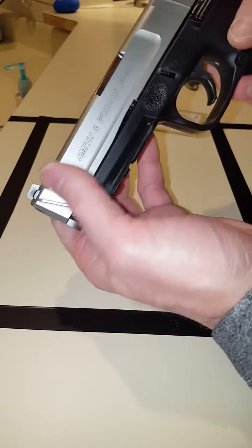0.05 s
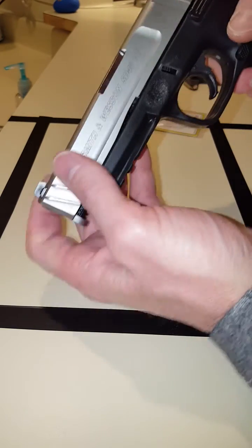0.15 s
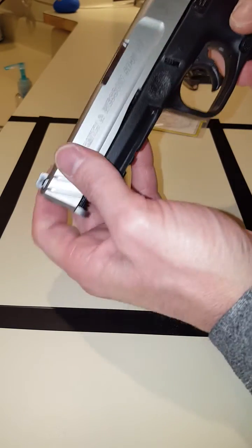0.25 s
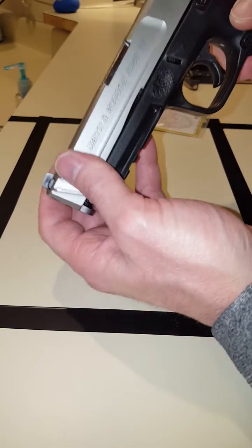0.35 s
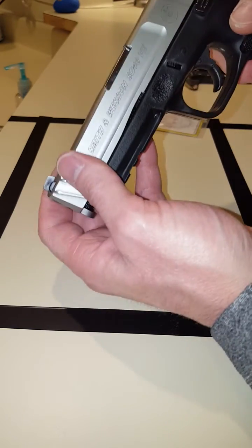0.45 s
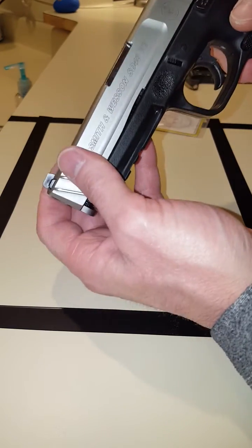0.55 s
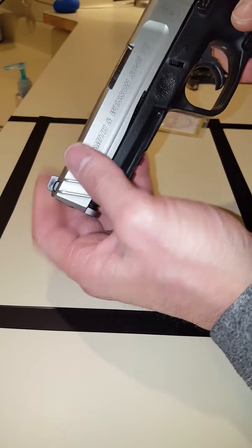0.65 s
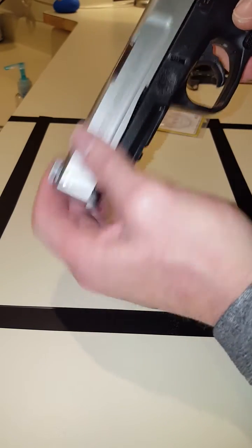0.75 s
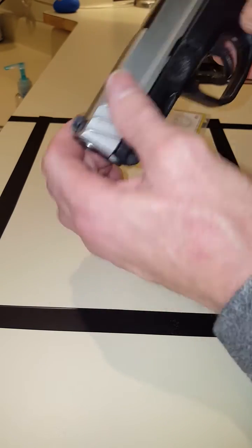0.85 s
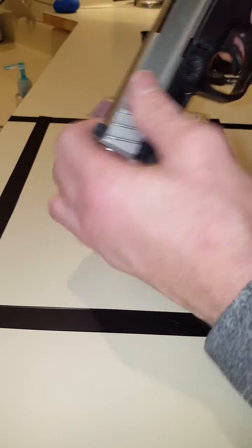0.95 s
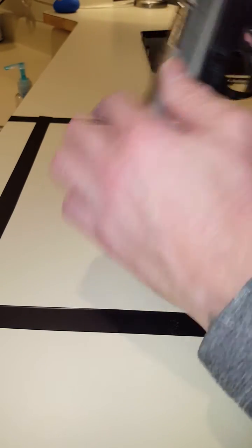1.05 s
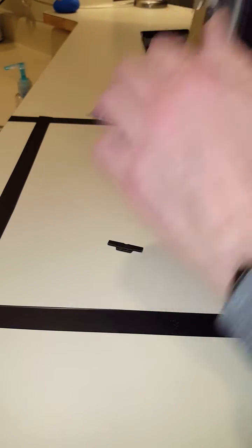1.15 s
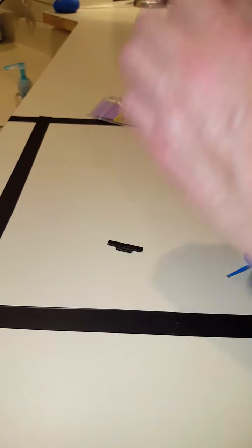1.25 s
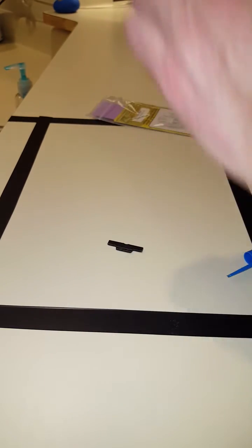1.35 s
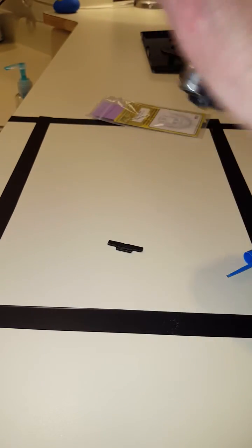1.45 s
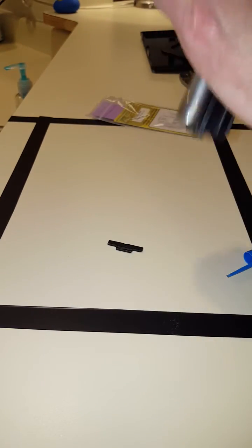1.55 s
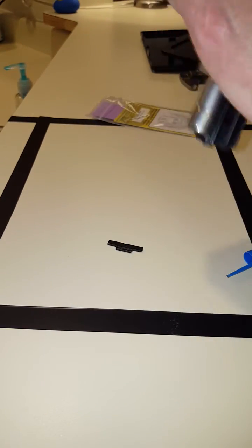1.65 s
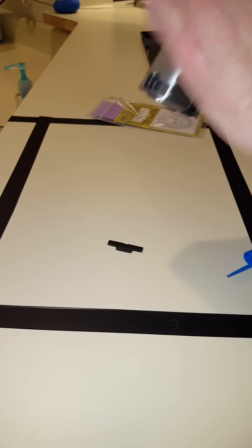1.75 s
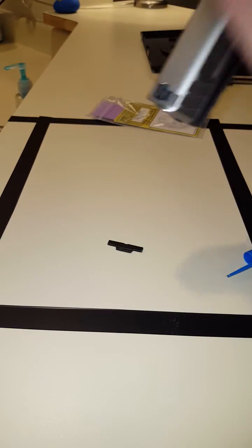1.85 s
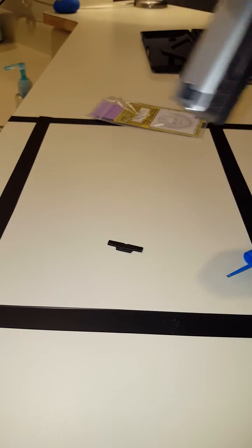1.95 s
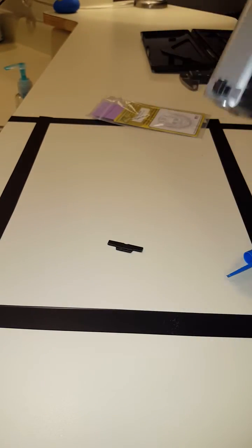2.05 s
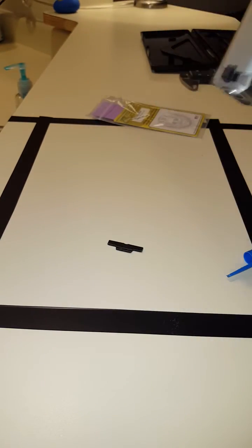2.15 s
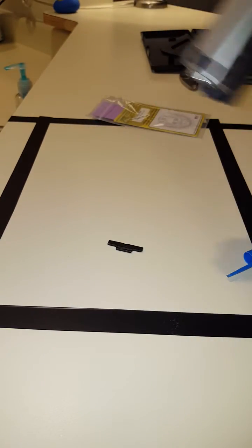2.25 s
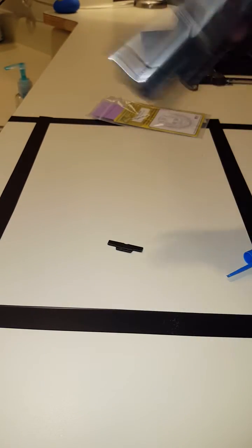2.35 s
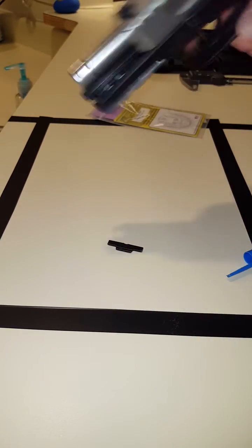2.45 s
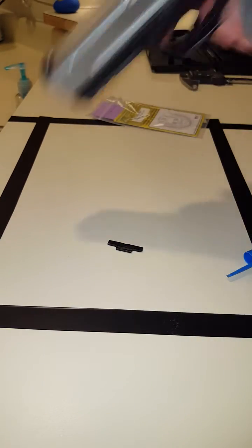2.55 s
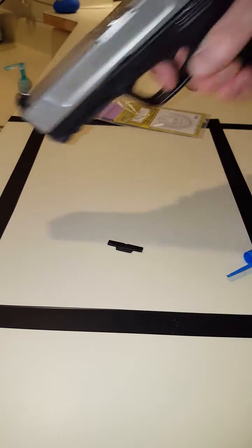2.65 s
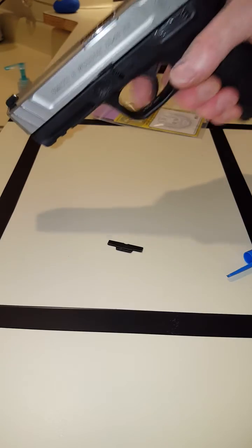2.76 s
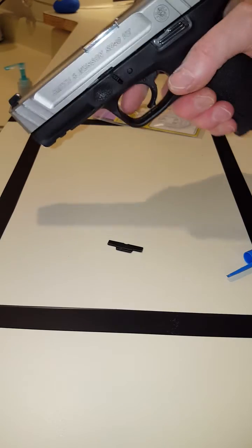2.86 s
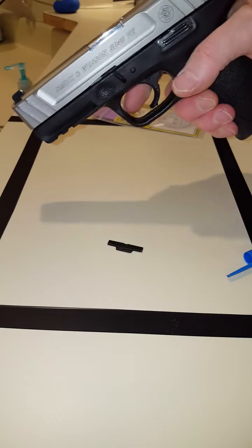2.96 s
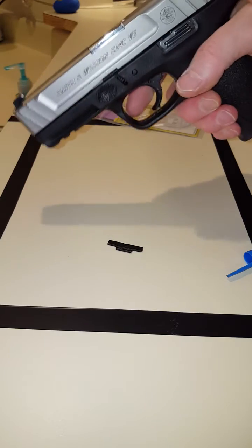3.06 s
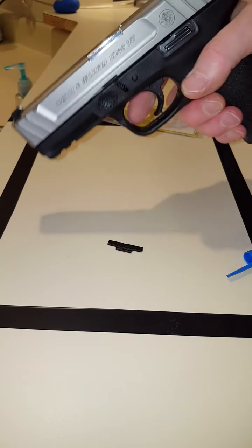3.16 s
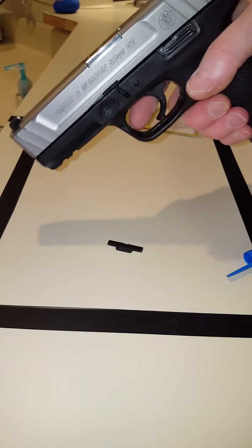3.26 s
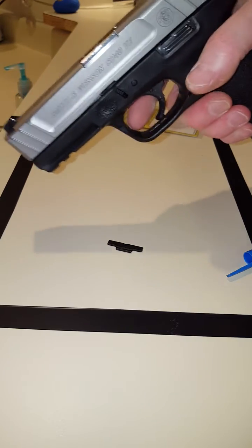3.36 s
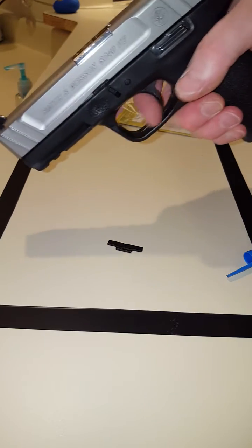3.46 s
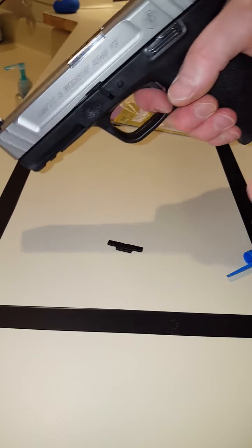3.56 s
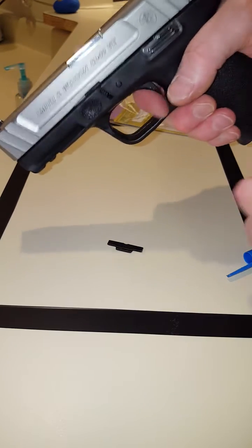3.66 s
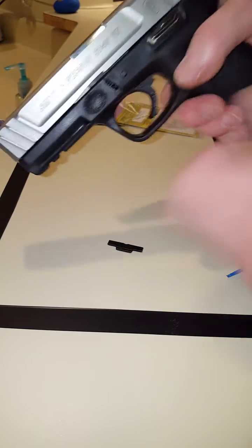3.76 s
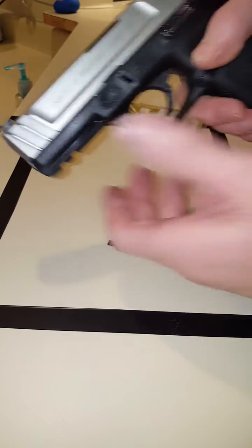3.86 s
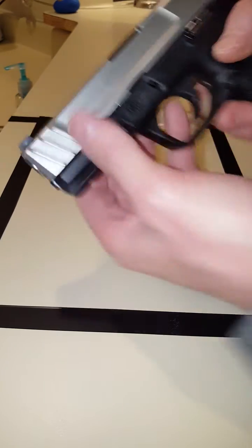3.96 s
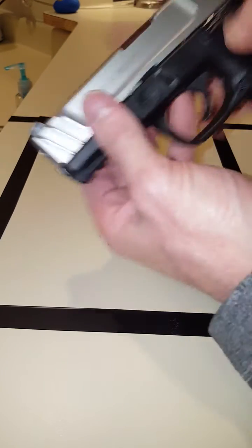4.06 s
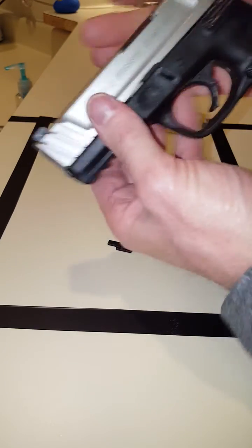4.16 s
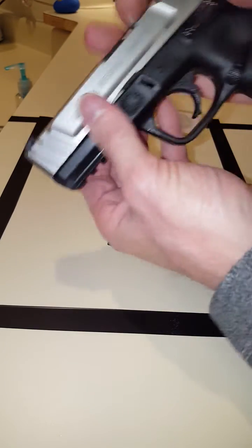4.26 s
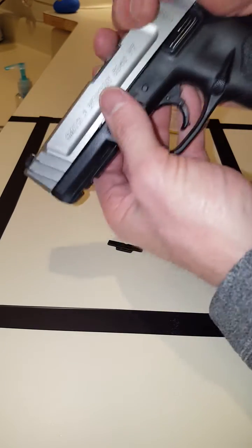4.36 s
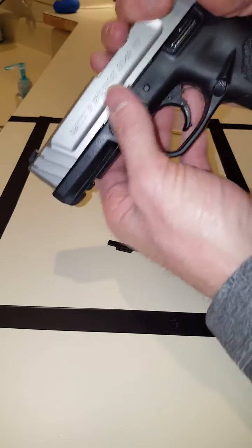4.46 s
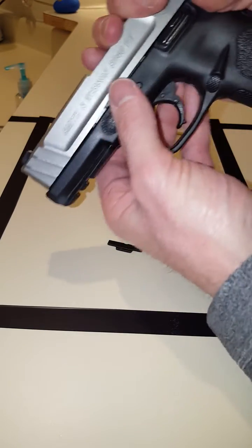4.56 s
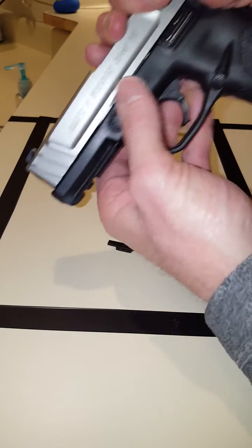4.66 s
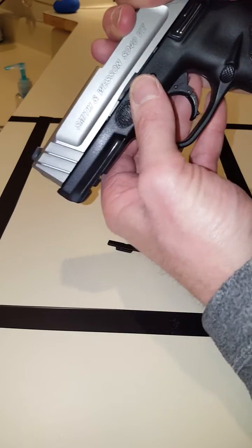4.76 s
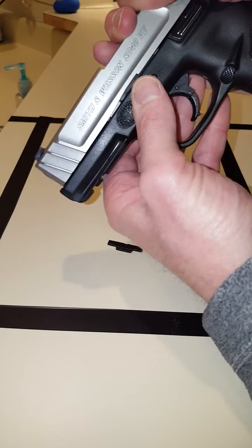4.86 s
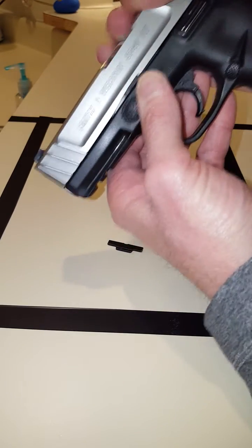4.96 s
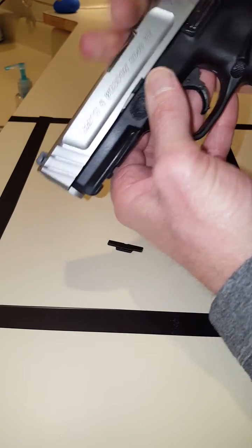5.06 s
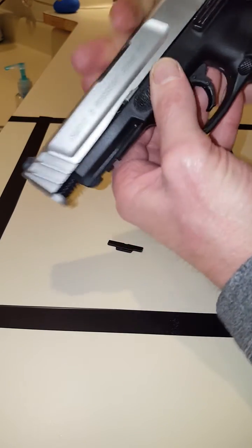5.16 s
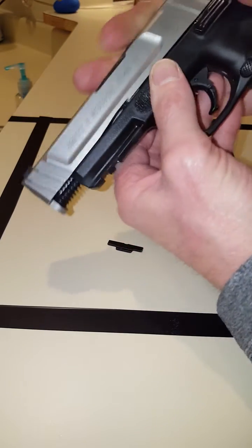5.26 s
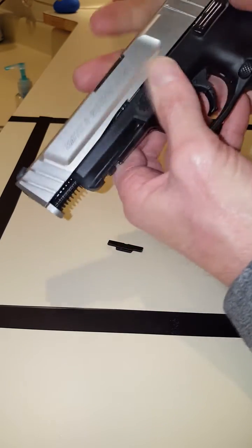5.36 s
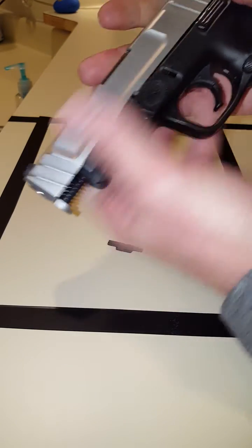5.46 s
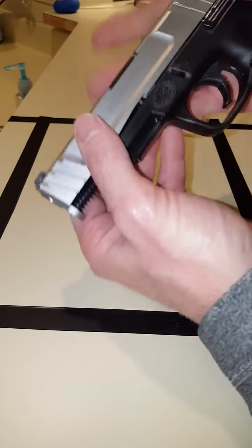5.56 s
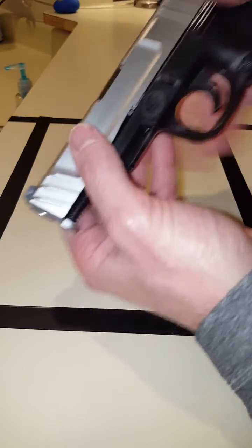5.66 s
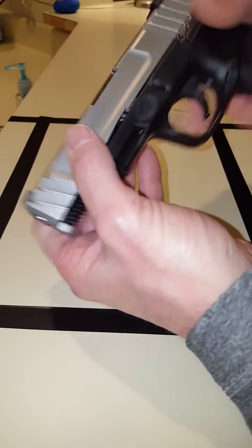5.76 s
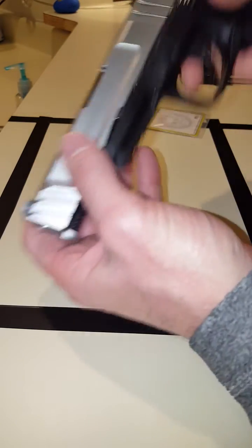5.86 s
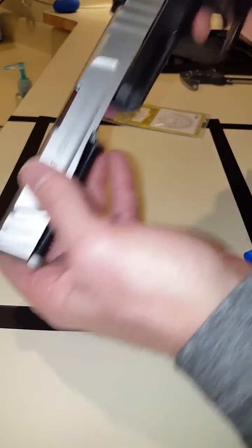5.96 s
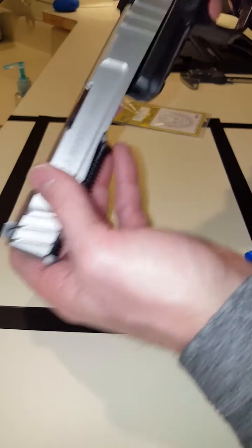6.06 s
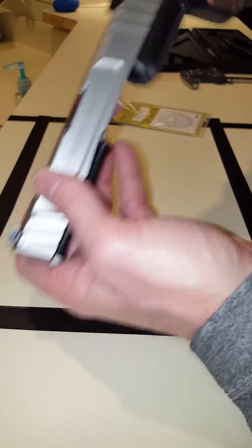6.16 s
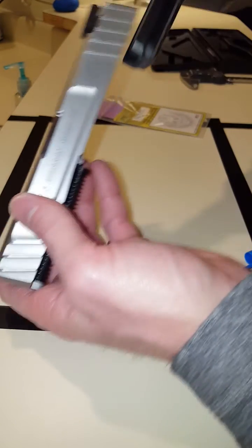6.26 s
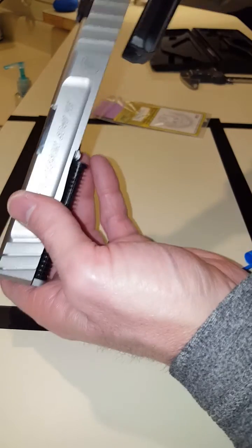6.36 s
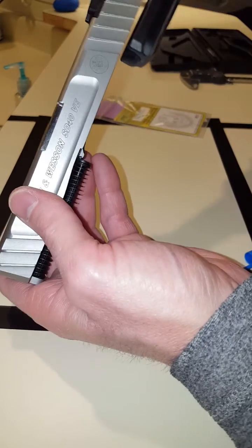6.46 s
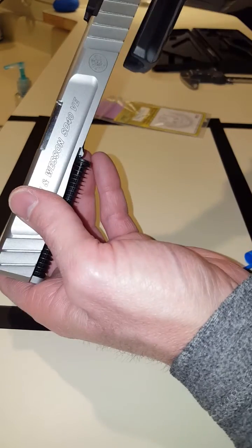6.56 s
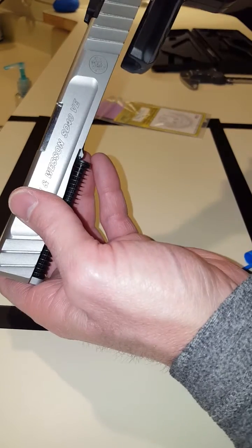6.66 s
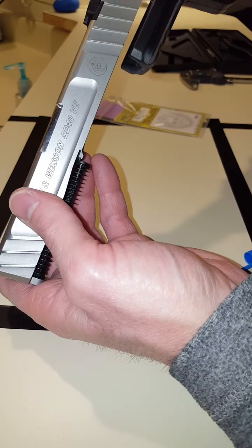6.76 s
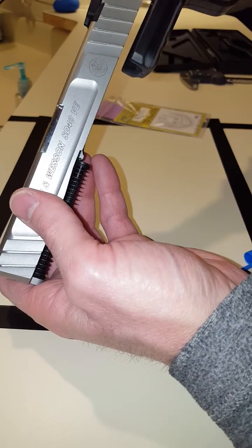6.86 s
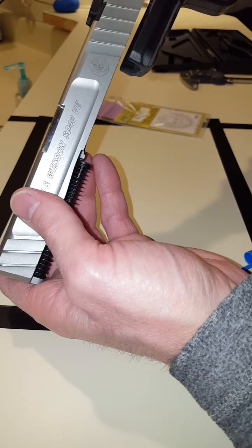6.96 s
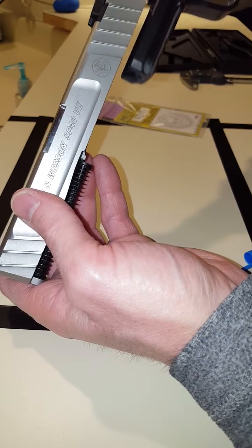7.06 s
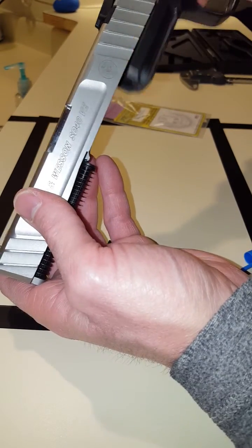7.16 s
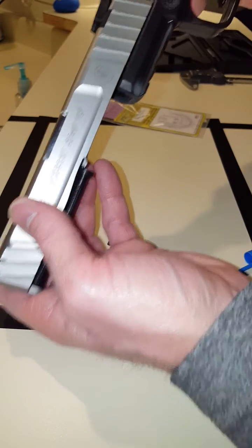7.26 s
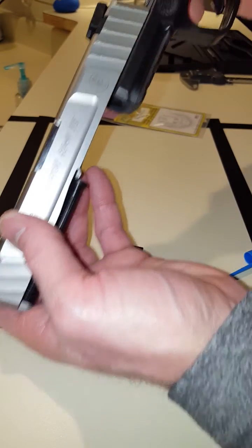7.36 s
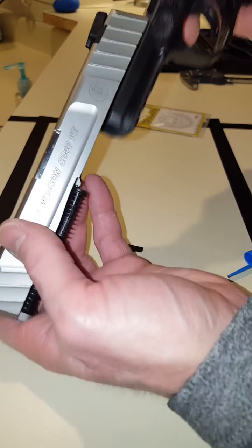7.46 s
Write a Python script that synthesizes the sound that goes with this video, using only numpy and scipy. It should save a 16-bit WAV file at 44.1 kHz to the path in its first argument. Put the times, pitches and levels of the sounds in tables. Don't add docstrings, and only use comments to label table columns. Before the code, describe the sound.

Over a steady low fan hum, steel parts scrape, clack and slam in irregular bursts, close and dry with a short bright room ring. The loudest blows fall in the first half, and the fan briefly dips after each as the automatic gain reacts. Later handling is softer: catches, rattles, skin brushing metal, a short sliding scrape, and two last clicks near the end.

```python
import sys
import numpy as np
from scipy import signal
from scipy.fft import rfft, irfft
from scipy.io import wavfile
from scipy.ndimage import uniform_filter1d

SR = 44100
rng = np.random.default_rng(int(sys.argv[2]) if len(sys.argv) > 2 else 0)


def dump_mix(stems):
    frames = np.atleast_2d(stems).T
    limited = np.clip(frames, -1, 1)
    pcm = np.round(limited * 32767).astype(np.int16)
    wavfile.write(sys.argv[1], SR, pcm)


def ratio(d):
    e = np.asarray(d, float) / 20
    return 10 ** e


N = 332073

# (time [s], frame knock [dB], knock pitch [Hz], steel tick [dB], ring share [dB])
BLOWS = [(.7997, -27.5, 2050, -30, 8.5), (.828, -18.5, 2140, -25, -13.5), (.838, -17.5, 3330, -12.5, -2.5),
         (.8444, -11.5, 3330, -13, -26), (.8522, -22, 1910, -26, 2.5), (1.4061, -15, 5500, -4, 3.5),
         (1.4456, -11, 2550, -3, -4), (1.454, -16, 2400, -20, -2.5), (1.731, -30, 2500, -15.5, -2.5),
         (1.7362, -16, 3870, -8.5, 7.5), (1.7411, -14, 1890, -1, -14), (1.7496, -20.5, 2600, -20.5, 4),
         (2.3784, -19, 2940, -15, 7), (2.3878, -9.5, 2420, -7, -8), (1.4475, -23.5, 2400, -8, -8),
         (2.4373, -21.5, 3450, -15.5, -11.5), (2.526, -27.5, 2475, -25.5, 8), (2.5537, -19.5, 2200, -6, 6),
         (2.56, -14.5, 2400, -2.5, 4), (2.5681, -14, 1430, -17.5, 2), (2.587, -17.5, 2790, -17.5, 3.5),
         (3.5495, -16, 1484, -9.5, 0), (3.554, -18, 3580, -3, 0.5), (3.588, -27, 2700, -17, 2.5)]
# (time [s], frame knock [dB], knock pitch [Hz], steel tick [dB], ring share [dB])
CATCHES = [(1.5694, -27.5, 3295, -45.5, -4), (1.5789, -36, 2560, -24, -21), (1.7074, -29, 3330, -41, 1),
           (2.2706, -28.5, 1845, -29.5, -24), (2.3435, -33, 2020, -21, -3),
           (3.4867, -35.5, 2340, -50.5, -6.5), (3.7406, -35.5, 1932, -23.5, 1.5),
           (3.7513, -32, 2590, -39, 3.5), (4.1857, -27.5, 1885, -29.5, -10), (4.4421, -34.5, 2200, -33, 2),
           (4.4895, -21.5, 3280, -24.5, -17), (4.504, -22, 2170, -27, -7.5),
           (4.9998, -31, 2387, -28.5, 4.5), (5.0063, -22.5, 2200, -39, -6), (5.0151, -22, 3500, -24, -22),
           (5.1803, -31, 2010, -38, -13), (5.331, -21.5, 3450, -12.5, -0.5), (5.336, -25, 2160, -37, -5),
           (5.7759, -22.5, 3040, -33.5, -4), (5.813, -23.5, 3004, -38, -10), (5.832, -28, 2200, -33.5, 3.5),
           (5.873, -26, 2200, -40, -1), (7.395, -24, 1850, -30, -4), (7.4678, -31, 2690, -29.5, -11)]
# (time [s], frame knock [dB], knock pitch [Hz], steel tick [dB])
LOOSE_TICKS = [(1.0592, -41, 2806, -58), (1.255, -39.5, 2610, -51), (1.3606, -52, 4297, -40.5),
               (1.6882, -42, 3330, -74.5), (2.779, -44.5, 3700, -40), (3.5363, -48, 4200, -37),
               (4.0378, -44.5, 2820, -44), (7.404, -32, 4520, -46), (4.2911, -37, 2590, -42),
               (4.3407, -38, 1710, -38), (4.387, -37, 1530, -59), (4.526, -53.5, 2840, -33),
               (5.108, -62, 3000, -40), (5.177, -34, 2120, -52), (5.0111, -29, 3170, -33),
               (5.353, -31, 2320, -31), (5.552, -42.5, 3560, -47), (5.737, -40.5, 3020, -52),
               (6.1862, -39, 3200, -56), (6.172, -38, 2320, -51), (6.212, -35, 2200, -42),
               (2.408, -19.5, 2700, -17.5), (5.8907, -38, 2280, -42.5), (5.9065, -27, 2200, -44),
               (5.9382, -26, 2600, -37), (5.9605, -35, 3200, -28), (5.9757, -35, 2800, -37),
               (5.9825, -36, 2400, -41), (6.004, -34, 2500, -42), (6.032, -35, 3000, -45),
               (1.7605, -22, 2400, -13.5), (5.1645, -45, 6300, -40), (5.2035, -45, 2500, -50),
               (5.195, -44, 2500, -50), (3.571, -20.5, 2700, -10.5), (3.578, -24, 2630, -13),
               (1.422, -26, 2405, -17.5), (1.426, -25.5, 3000, -16), (1.4315, -26, 2300, -20),
           (1.437, -28.5, 2500, -22), (1.441, -24.5, 2312, -22.5), (1.462, -23.5, 2500, -16),
           (1.536, -34.5, 3007, -36), (1.696, -36, 3300, -55.5), (1.259, -43.5, 2400, -51.5),
           (2.2505, -39, 2296, -41), (2.264, -40, 3000, -42.5), (2.279, -33.5, 2086, -32.5),
           (2.3488, -33, 3480, -27), (2.354, -36, 3000, -31.5), (2.4126, -19.5, 4000, -19),
           (2.417, -24, 2700, -22), (2.399, -22.5, 2500, -22.5), (5.033, -40, 2900, -44),
           (5.19, -40, 2300, -45), (5.85, -35, 4000, -42), (5.998, -27, 2200, -38), (6.048, -40, 3000, -45),
           (6.238, -39, 2700, -50), (5.822, -36, 3000, -46), (4.116, -47, 2300, -50),
           (4.007, -50, 3000, -48)]
# (time [s], frame knock [dB], steel tick [dB])
TOUCHES = [(.3842, -47, -60), (.7937, -39, -42.5), (0.999, -40.5, -60), (1.224, -42, -56),
           (1.2897, -42, -36), (1.3889, -40, -47.5), (1.3979, -35, -28.5), (1.668, -50, -42),
           (1.718, -40, -27.5), (1.9767, -47, -49), (2.219, -35, -33), (2.2467, -43, -39),
           (2.323, -34, -34), (3.4486, -48, -57.5), (3.4709, -37, -31), (3.508, -52, -35),
           (4.0143, -43.5, -50), (4.0754, -39, -44), (4.2683, -37.5, -49), (4.368, -34, -46),
           (4.428, -54, -64), (4.965, -38.5, -64), (5.146, -32, -43), (5.292, -36.5, -58),
           (5.4795, -39.5, -51.5), (5.5915, -34.5, -53), (5.6064, -33, -42), (7.1888, -36.5, -56),
           (7.2637, -43, -59.5), (7.3863, -28.5, -39)]
# (time [s], level [dB])
PINGS = [
    (2.44, -27.5),
]
# (time [s], thud peak [dB], thud pitch [Hz], low push [dB], left-right balance [dB])
THUDS = [(0.842, -29, 1010, -52.5, 0), (1.445, -22.5, 603, -27.5, 14.5), (1.7423, -20.5, 600, -23, -13),
         (1.744, -24, 494, -15.5, -13.5), (2.389, -15.5, 534, -30.5, -2.5), (2.56, -14.5, 567, -23.5, -15),
         (2.5633, -28, 480, -22, -10.5), (2.568, -14.5, 423, -14.5, -14.5), (3.554, -20, 621, -23.5, -6.5),
         (4.491, -53, 1042, -43.5, 3), (0.825, -25.5, 1000, -52, 1), (4.189, -37, 989, -53, 8),
         (1.7481, -26.5, 543, -30.5, -11), (3.55, -28, 1097, -45, 1.5), (2.5655, -25, 652, -41, -10.5),
         (5.177, -35, 920, -49.5, 12)]
# (start [s], peak [s], end [s], frame rasp [dB], steel hiss [dB])
STROKES = [(0, .003, .08, -57, -52), (.797, .808, .835, -27.5, -45), (.825, .84, .856, -24.5, -24.5),
           (1.41, 1.428, 1.455, -33, -32), (1.68, 1.72, 1.737, -37, -52), (2.04, 2.1, 2.22, -62.5, -80),
           (2.2, 2.29, 2.345, -44, -56), (2.515, 2.525, 2.555, -27.5, -41), (3.995, 4.02, 4.07, -53, -59),
           (4.17, 4.31, 4.43, -51.5, -58.5), (4.99, 5.01, 5.1, -54, -57), (5.14, 5.178, 5.235, -38.5, -52),
           (5.334, 5.345, 5.46, -45.5, -39), (5.38, 5.45, 5.55, -52.5, -53), (6.2, 6.235, 6.26, -40, -60),
           (2.265, 2.285, 2.33, -42, -46), (5.865, 5.9, 5.99, -29, -47), (5.9, 5.985, 6.075, -28, -41),
           (6.16, 6.205, 6.27, -36, -59.5), (7.15, 7.21, 7.32, -62, -82.5),
           (7.388, 7.412, 7.455, -33.5, -58), (7.458, 7.472, 7.57, -38.5, -62)]
# (start [s], stop [s], frame rasp [dB], steel hiss [dB])
RUNUPS = [
    (0.845, 0.875, -28.5, -43),
    (1.72, 1.752, -22.5, -23),
    (2.334, 2.39, -33, -50),
    (2.534, 2.564, -34, -26.5),
    (4.412, 4.498, -51, -60),
]
# (time [s], pitch [Hz], level [dB], t60 [s])
RINGS = [(.846, 1800, -34, .2), (1.422, 2400, -30.5, .25), (1.452, 2400, -30.5, 0.25),
         (1.46, 1600, -36, 0.26), (1.452, 11300, -28.5, 0.16), (1.452, 4070, -29.5, 0.23),
         (1.75, 2370, -25.5, 0.24), (1.759, 2870, -29, .35), (1.752, 4080, -29, 0.3),
         (1.745, 7130, -30.5, 0.36), (1.745, 9500, -28.5, 0.31), (1.76, 1600, -35, 0.32),
         (2.404, 2700, -32, .2), (2.404, 4000, -34, 0.23), (2.55, 2740, -21, 0.2), (2.575, 4110, -26, .3),
         (2.566, 7810, -25.5, 0.29), (2.57, 9820, -26, 0.33), (2.585, 1950, -30.5, .2),
         (3.569, 2700, -34, 0.28), (3.569, 10000, -27, 0.27), (3.569, 8600, -34.5, 0.31),
         (3.569, 4400, -30, .15), (3.569, 13500, -28, .25), (2.274, 7110, -45.5, 0.2565),
         (2.44, 7200, -38.5, 0.18), (4.508, 2830, -42, 0.25), (5.163, 2100, -31.5, 0.16),
         (5.334, 2060, -30, 0.12), (5.871, 2280, -31, .12), (5.889, 2170, -28.5, 0.11),
         (5.895, 3660, -36, 0.23), (5.955, 6050, -37.5, 0.19), (5.958, 3200, -32, .15),
         (5.98, 2130, -28, 0.06), (.836, 10600, -31, 0.15), (.838, 4000, -26, .1), (6.185, 2900, -40, 0.19),
         (5.176, 2150, -30, 0.071), (5.045, 2900, -41, .1), (1.75, 5600, -32.5, .3), (.8, 2150, -31, 0.12),
         (3.745, 2800, -44, 0.24), (3.49, 2700, -50, 0.297), (3.57, 14800, -30, .25),
         (2.575, 17000, -29, .25), (1.455, 14000, -32, .2), (2.35, 4070, -39.5, .2),
         (2.39, 12500, -40.5, .2), (2.565, 14000, -31, 0.23)]
# (start [s], end [s], level [dB])
BRUSHES = [(.125, 0.18, -67), (.75, .79, -63), (1.0, 1.24, -57), (1.13, 1.26, -60), (5.2, 5.33, -68),
           (5.6, 5.78, -68), (1.28, 1.4, -70), (4.5, 4.62, -64), (5.92, 6.06, -52), (6.165, 6.255, -57),
           (4.25, 4.41, -62), (3.99, 4.06, -60), (2.035, 2.147, -71), (2.179, 2.224, -63.5),
           (3.859, 4.023, -73.5), (5.138, 5.17, -46), (5.15, 5.22, -54), (5.03, 5.12, -62),
           (0, 0.062, -61.5)]

# (frequency [Hz], width [Hz], level [dB])
FRAME_MODES = [(2200, 980, 8), (2850, 360, -3), (3450, 400, -1), (1220, 1000, 3.5), (4000, 800, -15)]
# (frequency [Hz], level [dB])
STEEL_COLOUR = [(3500, -12.5), (5200, 2.5), (6200, -3.5), (7500, -4), (10500, 0.5), (13000, -3),
                (15300, -9.5), (16200, -22)]
# (frequency [Hz], level [dB], t60 [s])
STEEL_MODES = [(2370, -9, 0.14), (2785, -2.5, 0.15), (3550, -11, 0.25), (4120, -4, 0.15), (4550, -7, 0.27),
               (5710, -14.5, 0.2), (7250, -7, 0.33), (7640, -7.5, 0.28), (9130, -6, 0.15), (9820, -8, 0.28),
               (10860, -10, 0.11), (10800, -9, 0.22), (13000, -14, 0.2), (13830, -11.5, 0.2)]
# (frequency [Hz], t60 [s])
ROOM_DECAY = [(300, 0.16), (1000, 0.11), (2500, 0.41), (5000, 0.39), (10000, 0.3), (15000, 0.22)]
# (frequency [Hz], level [dB])
ROOM_COLOUR = [(300, -11.5), (1100, 1.5), (1800, 0), (2700, -1), (4200, -3.5), (5500, -5), (10000, -5),
               (15000, 2)]
# (frequency [Hz], level [dB])
LEFT_COLOUR = [(1500, 1), (4000, -2), (8000, 2), (13000, 3.5)]
# (time [s], left-right balance [dB])
SIDEWAYS = [(0, 3), (.85, 1.5), (1.42, -0.5), (1.75, -0.5), (2.39, 1), (2.57, 0), (3.55, 0), (4.3, 2.5),
            (5, 0), (5.35, 1), (5.95, 2.5), (7.4, 1), (7.6, 3)]

# (frequency [Hz], level [dB per Hz])
FAN_COLOUR = [(15, -30), (40, -25.5), (90, -5), (330, -5), (560, -6), (650, -20), (800, -27.5),
              (1300, -30.5), (2900, -34), (3100, -40), (5200, -47.5), (8600, -55.5), (13000, -51.5),
              (15300, -56.5)]
# (frequency [Hz], width [Hz], level [dB])
DUCT_MODES = [(98.03, 3.7, -52.5), (140, 78, -48), (248.4, 25, -51.5), (365, 10.2, -53), (486, 46, -53.5),
              (552.4, 55, -44), (960, 120, -69)]
# (frequency [Hz], level [dB])
MOTOR_TONES = [(963.6, -63), (1082, -64), (1200, -72)]
# (frequency [Hz], coherence [0-1])
COHERENCE = [(60, .9), (200, .88), (400, .92), (560, .75), (1100, .85), (1400, .4), (2500, .25), (4000, 0)]
# (frequency [Hz], left-right balance [dB])
FAN_BALANCE = [(200, 0), (350, -4), (470, -12), (570, -21), (650, -10), (780, 0), (950, 14), (1250, 14),
               (1800, 0), (2800, -4), (3400, 1)]
# (frequency [Hz], lead [rad])
LEFT_LEAD = [(100, -.1), (520, .1), (650, 2.9), (1400, 3.6), (2300, 5.9)]
# (time [s], hold [s], depth [dB], depth after the step up [dB])
DUCKS = [
    (1.44, 0.21, -13.5, -8.5),
    (1.743, 0.25, -19.5, -14.5),
    (2.38, 0.088, -9, -7),
    (2.58, 0.27, -23, -17),
    (3.525, 0.31, -12, -7.5),
    (3.975, 0.091, -10, -6),
    (4.193, 0.47, -1.5, -2),
]

FRAME_HZ, PING_HZ = 2060, 7060
LIGHT_RING_DB, PING_RING_DB, PING_TICK_DB = -2, 3.5, -29.5
HARD_DB, BRIGHTER_DB, TREBLE_HZ = -7, 0.24, 9100
CONTACT_T60 = 0.018
CONTACT_LEAD_S = 0.002
PAN_DB, PAN_DB_PER_OCTAVE, PAN_SPREAD_DB = 3, 2, -2
RASP_ENDS_DB, HISS_ENDS_DB, SWELL_POWER = -19, -23, 1.2
CATCH_DEPTH, CATCHES_PER_S = 35, 350
RING_RISE_S, RING_SPREAD, RING_JANGLE_DB = 0.0022, 0.065, 3.5
BRUSH_HZ, BRUSH_WIDTH_HZ = 11500, 8300
WALL_S, WALL_T60 = 0.0175, 0.03
FAN_DB, WAVER_DB = -36.5, 2.5
STEP_S, CREEP_DB_PER_S = 0.014, 20
BASS_EDGE_HZ, BASS_DUCK_SHARE = 270, 0.92
SINK_EARLY = 0.31
HOLLOW_HZ, HOLLOW_WIDTH_HZ, HOLLOW_SHARE = 1000, 500, 0.18
DULL_HZ, DULL_WIDTH_HZ, DULL_SHARE = 5030, 360, 0.54
LOW_EDGE_HZ, HIGH_EDGE_HZ, LEAK_DB = 28, 15750, -31


def contacts():
    loose = [(*row, LIGHT_RING_DB) for row in LOOSE_TICKS]
    touches = [(s, knock, FRAME_HZ, tick, LIGHT_RING_DB) for s, knock, tick in TOUCHES]
    pings = [(s, db, PING_HZ, db + PING_TICK_DB, PING_RING_DB) for s, db in PINGS]
    return BLOWS + CATCHES + loose + touches + pings


def click(knock_db, hz, tick_db, chance):
    late = np.maximum(np.arange(chance.shape[-1]) / SR - CONTACT_LEAD_S, 0)
    rise = 1 - np.exp(-late / 0.000088)
    tail_db = -2.5 + 0.15 * np.clip(tick_db + 10, -30, 5)
    burst = rise * (ratio(-60 * late / 0.017) + ratio(tail_db - 60 * late / CONTACT_T60))
    force = chance[0] * burst
    frame = sum(ratio(db) * resonate(resonate(force, f, w), f, 3 * w) for f, w, db in FRAME_MODES)
    knock = resonate(resonate(force, hz, 590), hz, 1200) + 0.24 * frame
    treble_db = BRIGHTER_DB * np.clip(tick_db - HARD_DB, -25, 9)
    steel = coloured(chance[1], STEEL_COLOUR)
    tick = coloured(steel, [(TREBLE_HZ, 0), (1.3 * TREBLE_HZ, treble_db)]) * burst
    return ratio(knock_db + 4.5) * knock / abs(knock).max() + ratio(tick_db - 1.0) * tick / abs(tick).max()


def thud(db, hz, push_db, pan_db):
    t, flip = np.arange(3000) / SR, np.array([[1], [-1]])
    note = np.sin(2 * np.pi * hz * t)
    overtone = 0.68 * flip * np.sin(2 * np.pi * 1.7 * hz * t)
    swing = ratio(db - 60 * t / 0.02) * (note + overtone)
    push = ratio(push_db - 60 * t / 0.018) * np.sin(2 * np.pi * 130 * t)
    blow = signal.sosfilt(signal.butter(2, 70, "high", fs=SR, output="sos"), swing - push)
    return blow * ratio(pan_db * flip / 2)


def stroke(start, peak, end, rasp_db, hiss_db):
    t = np.arange(start, end, 1 / SR)
    peak = min(max(peak, start), end)
    slow = np.interp(t, [start, peak, end + 1e-3], [1, 0, 1]) ** SWELL_POWER
    noise = rng.standard_normal((2, 2, len(t)))
    caught = (rng.random(len(t)) < CATCHES_PER_S / SR) * 1.0
    catches = CATCH_DEPTH * uniform_filter1d(caught, 70)
    force = noise[0] * (1 + catches)
    rasp = sum(ratio(db) * resonate(resonate(force, f, w), f, 2.3 * w) for f, w, db in FRAME_MODES)
    hiss = coloured(noise[1], STEEL_COLOUR) * (1 + 0.3 * catches)
    rasp_level = ratio(rasp_db + RASP_ENDS_DB * slow)
    hiss_level = ratio(hiss_db + HISS_ENDS_DB * slow)
    sound = rasp_level * evened(rasp) + hiss_level * evened(hiss)
    return start, sound * signal.windows.tukey(len(t), 0.12)


def shimmer(hz, db, t60):
    t = np.arange(round(0.4 * SR)) / SR
    noise, width = rng.standard_normal((2, len(t))), RING_SPREAD * hz
    band = evened(resonate(resonate(noise, hz, width), hz, 2 * width))
    jangle_db = RING_JANGLE_DB * evened(uniform_filter1d(noise[0], size=200))
    rise = 1 - np.exp(-t / RING_RISE_S)
    return band * rise * ratio(db - 60 * t / max(t60, 0.03) + jangle_db)


def brush(start, end, db):
    noise = rng.standard_normal((2, round((end - start) * SR)))
    hiss = resonate(resonate(noise, BRUSH_HZ, BRUSH_WIDTH_HZ), BRUSH_HZ, 2 * BRUSH_WIDTH_HZ)
    return start, ratio(db) * evened(hiss) * signal.windows.tukey(noise.shape[1], 0.7)


def ports(pair, pan_db):
    lag = 34
    right = np.roll(0.071 * pair[0] + 1.35 * pair[1], lag)
    return np.array([pair[0], right]) * ratio(np.clip(pan_db, -12, 12) * np.array([[0.5], [-0.5]]))


def opposed(pair):
    band = resonate(pair, 1018, 500)
    return pair - 0.805 * np.array([0 * band[0], band[0] + band[1]])


def afterglow():
    t = np.arange(SR // 2) / SR
    hz, times, z = signal.stft(rng.standard_normal((2, len(t))), SR, nperseg=256)
    decay_db = read(ROOM_COLOUR, hz)[:, None] - 60 * times / read(ROOM_DECAY, hz)[:, None]
    tail = signal.istft(z * ratio(decay_db), SR, nperseg=256)[1]
    lump = (t > WALL_S) * ratio(-60 * (t - WALL_S) / WALL_T60)
    arrive = 0.12 + (1 - np.exp(-(t / 0.012) ** 4)) + lump
    tail = tail[:, :len(t)] * arrive
    ring = 0
    for f, db, t60 in STEEL_MODES:
        cluster = evened(resonate(rng.standard_normal((2, len(t))), f, 60 + 0.031 * f))
        ring = ring + ratio(db - 60 * t / np.clip(t60, 0.05, 0.28)) * cluster
    ring = ring * (0.78 + arrive)
    return tail / np.linalg.norm(tail[0]) + ratio(-10.5) * ring / np.linalg.norm(ring[0])


def fan():
    frames, hz = N // 2048 + 5, np.fft.rfftfreq(8192, 1 / SR)
    a, b, c, d = rng.standard_normal((frames, 4097, 4)).T
    humps = sum(ratio(2 * (db - FAN_DB + 30.0)) / w / (1 + (2 * (hz - f) / w) ** 2) ** 2
                for f, w, db in DUCT_MODES)
    same, lead = np.clip(read(COHERENCE, hz), -1, 1), read(LEFT_LEAD, hz)
    tilt = ratio(0.5 * read(FAN_BALANCE, hz))
    centre = tilt ** 2 + tilt ** -2 + 2 * same * np.cos(lead)
    level = np.sqrt((ratio(2 * read(FAN_COLOUR, hz)) + humps) / centre)
    left = a + 1j * b
    right = same[:, None] * left + np.sqrt(1 - same ** 2)[:, None] * (c + 1j * d)
    left_gain = level * tilt
    right_gain = level / tilt * np.exp(-1j * lead)
    pair = np.array([left * left_gain[:, None], right * right_gain[:, None]])
    air = signal.istft(pair, nperseg=8192, noverlap=6144)[1][:, :N]
    t, tones = np.arange(N) / SR, 0
    for f, db in MOTOR_TONES:
        waver_db = WAVER_DB * evened(uniform_filter1d(rng.standard_normal(N), size=9000))
        tones = tones + ratio(db - 1.5 + waver_db) * np.sin(2 * np.pi * f * t)
    lobes = np.array([[3.5], [-0.7]])
    return ratio(FAN_DB) * air / np.sqrt(np.mean(air.mean(0) ** 2)) + lobes * tones


def ducked(air):
    t, gain_db = np.arange(N) / SR, np.zeros(N)
    for s, hold, db, rest_db in DUCKS:
        creep_s = abs(rest_db) / CREEP_DB_PER_S
        times = s + np.cumsum([0, STEP_S, hold - STEP_S, STEP_S, creep_s])
        gain_db = np.minimum(gain_db, np.interp(t, times, [0, db * SINK_EARLY, db, rest_db, 0]))
    bass = signal.sosfiltfilt(signal.butter(2, BASS_EDGE_HZ, fs=SR, output="sos"), air)
    hollow = resonate(air, HOLLOW_HZ, HOLLOW_WIDTH_HZ) * (1 - ratio(HOLLOW_SHARE * gain_db))
    return bass * ratio(BASS_DUCK_SHARE * gain_db) + (air - bass - hollow) * ratio(gain_db)


def evened(x):
    return x / np.sqrt(np.mean(x ** 2) + 1e-20)


def read(points, hz):
    f, value = np.transpose(points)
    return np.interp(np.log(hz + 1), np.log(f + 1), value)


def resonate(x, hz, width):
    r = np.exp(-np.pi * width / SR)
    return signal.lfilter([1 - r, 0, r - 1], [1, -2 * r * np.cos(2 * np.pi * hz / SR), r * r], x)


def coloured(x, points):
    size = x.shape[-1]
    return irfft(rfft(x) * ratio(read(points, np.fft.rfftfreq(size, 1 / SR))), size)


def add(mix, s, sound):
    part = mix[..., round(s * SR):][..., :sound.shape[-1]]
    part += sound[..., :part.shape[-1]]


def scene():
    near, sends, rows = np.zeros((2, N)), np.zeros((3, N)), contacts()
    chances = rng.standard_normal((len(rows), 2, 2, 1024))
    for k, (row, chance) in enumerate(zip(rows, chances)):
        s, knock_db, hz, tick_db, ring_db = row
        sound = click(knock_db, hz, tick_db, chance)
        pan_db = PAN_DB + PAN_DB_PER_OCTAVE * np.log2(hz / FRAME_HZ) + PAN_SPREAD_DB * chance.flat[0]
        add(near, s - CONTACT_LEAD_S, ports(sound, pan_db))
        add(sends[k % 3], s - CONTACT_LEAD_S, ratio(ring_db) * sound[0])
    slides = STROKES + [(s, stop, stop, rasp, hiss) for s, stop, rasp, hiss in RUNUPS]
    for k, row in enumerate(slides):
        s, sound = stroke(*row)
        add(near, s, sound)
        add(sends[k % 3], s, ratio(-14) * sound[0])
    glow = sum(signal.fftconvolve(send[None], afterglow(), axes=1)[:, :N] for send in sends)
    pistol = opposed(near + ratio(-1.0) * glow)
    for s, *part in RINGS:
        add(pistol, s, shimmer(*part))
    pistol = np.array([coloured(pistol[0], LEFT_COLOUR), pistol[1]])
    balance_db = np.interp(np.arange(N) / SR, *np.transpose(SIDEWAYS))
    pistol = pistol * ratio(balance_db * np.array([[0.5], [-0.5]]))
    for row in BRUSHES:
        add(pistol, *brush(*row))
    for s, *blow in THUDS:
        add(pistol, s, thud(*blow))
    return pistol + ducked(fan())


def band_limit(x):
    return signal.sosfilt(signal.butter(12, 16810, fs=SR, output="sos"), x)


def record(dry):
    heard = signal.sosfilt(signal.butter(2, LOW_EDGE_HZ, "high", fs=SR, output="sos"), dry)
    heard = heard - DULL_SHARE * resonate(heard, DULL_HZ, DULL_WIDTH_HZ)
    heard = np.clip(heard, -1, 1)
    low = signal.oaconvolve(heard, signal.firwin(511, HIGH_EDGE_HZ, fs=SR)[None], "same", axes=1)
    heard = low + ratio(LEAK_DB) * (heard - low)
    return band_limit(heard)


dry = scene()
out = record(dry)
dump_mix(out)
```